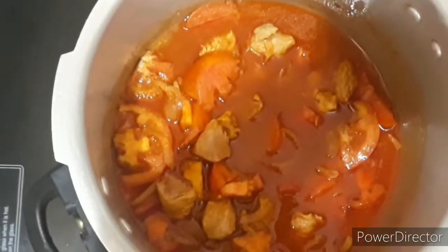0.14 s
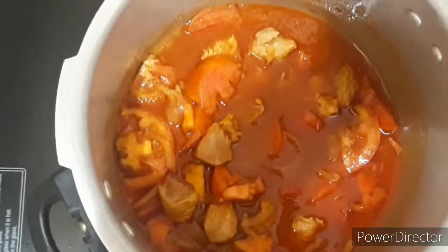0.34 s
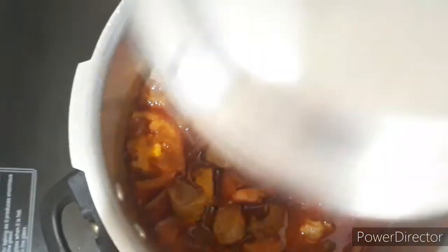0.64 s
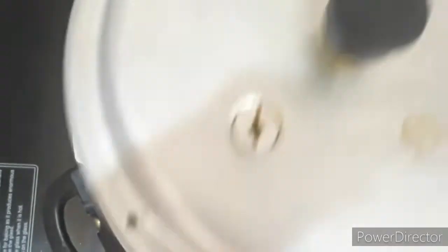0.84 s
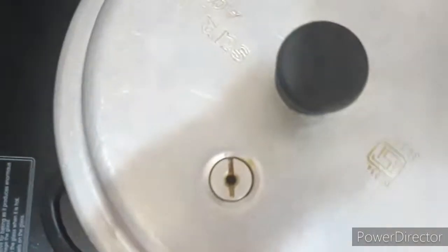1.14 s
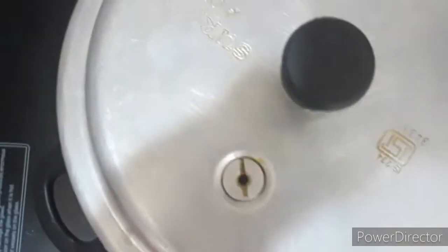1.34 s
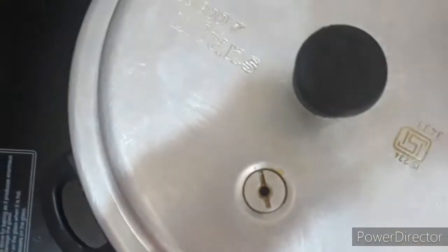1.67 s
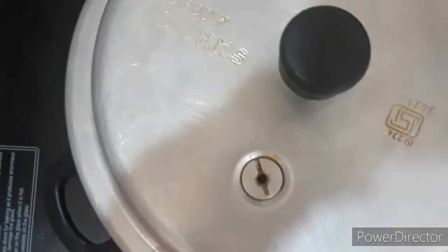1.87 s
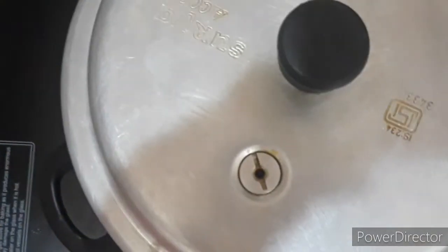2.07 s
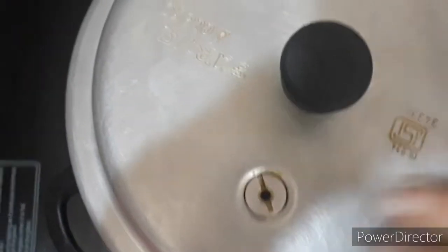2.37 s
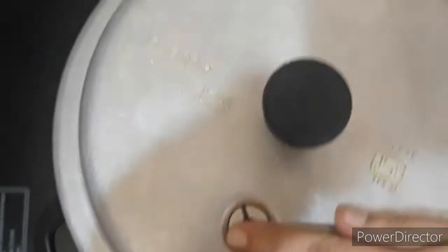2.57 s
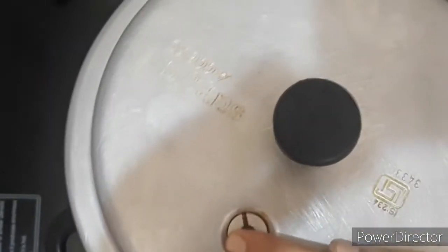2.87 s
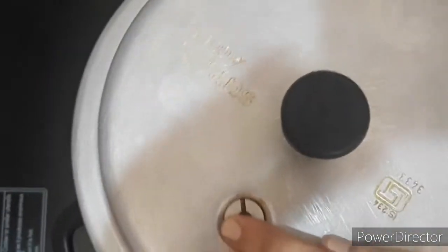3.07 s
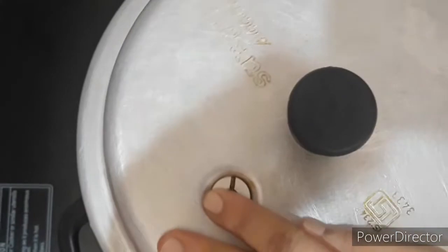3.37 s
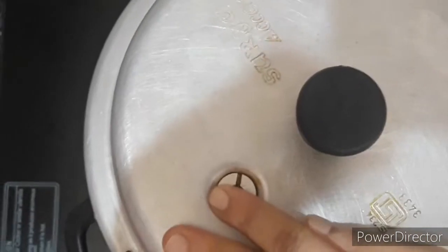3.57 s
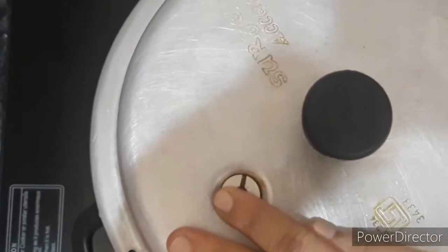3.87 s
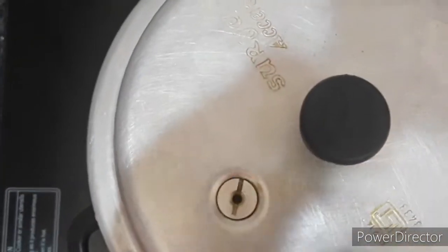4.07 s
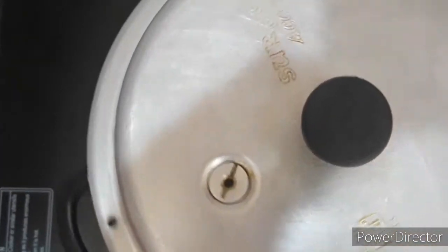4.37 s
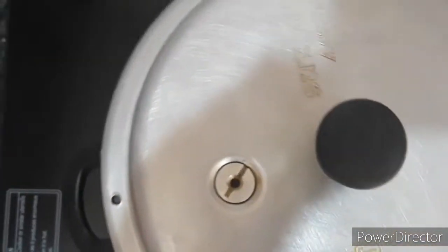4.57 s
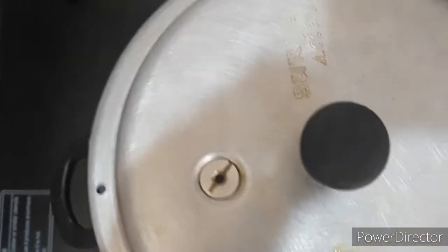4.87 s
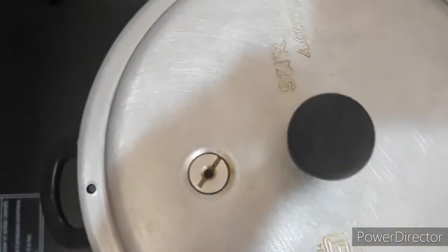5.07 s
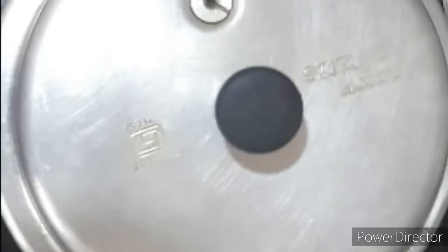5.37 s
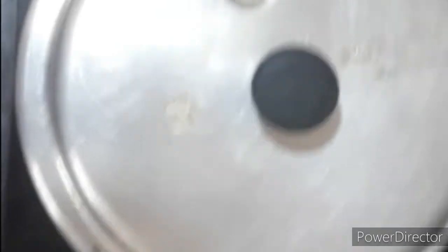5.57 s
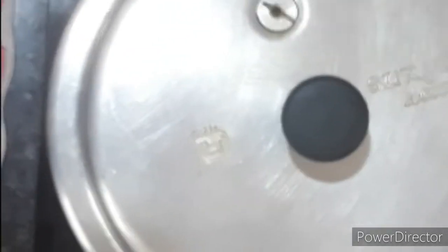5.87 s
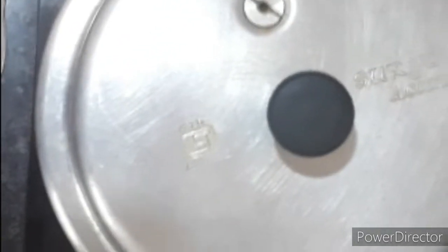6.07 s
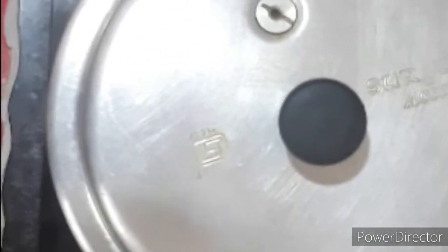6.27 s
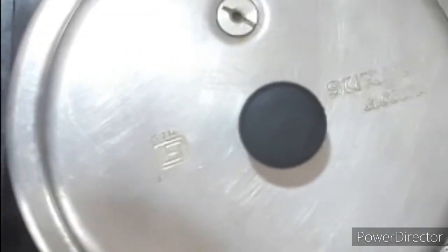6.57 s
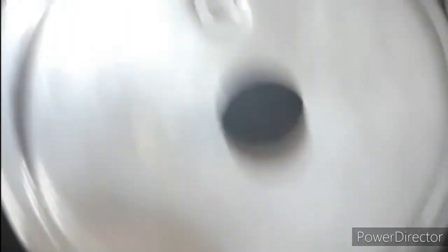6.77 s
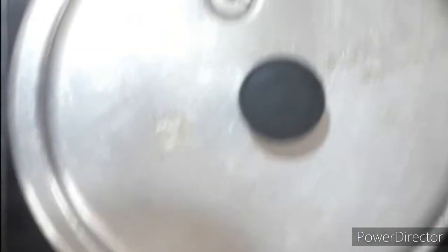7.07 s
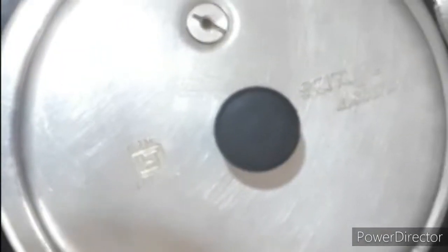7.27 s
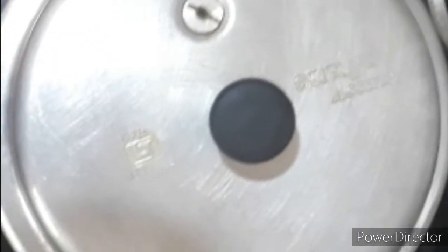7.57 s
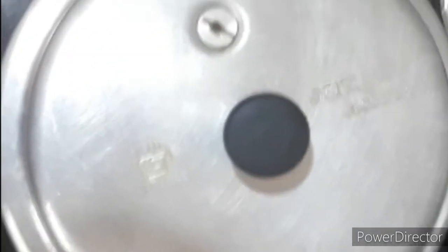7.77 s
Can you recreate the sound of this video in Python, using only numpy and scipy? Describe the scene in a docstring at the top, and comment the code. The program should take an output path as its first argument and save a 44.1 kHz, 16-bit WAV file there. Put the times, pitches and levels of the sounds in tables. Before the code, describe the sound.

A metal lid clanks onto a pressure cooker and grinds shut, then steam hisses and whistles, twice surging into a brighter jet.

```python
"""In a quiet kitchen a utensil clinks, then a metal lid is knocked onto a pressure cooker: each contact
cracks, rings the metal and thuds in the pot. A palm rubs the lid and twists it shut; the rubber seal
groans, rim grinds on rim and the hob booms. After a short silence steam hisses and whistles under the
weight, which twice lifts and lets a brighter jet blow at the microphone and buffet it."""
import sys
import numpy as np
from scipy import signal
from scipy.fft import rfft, irfft, next_fast_len
from scipy.io import wavfile
from scipy.ndimage import uniform_filter1d, map_coordinates

SR = 44100
rng = np.random.default_rng(int(sys.argv[2]) if len(sys.argv) > 2 else 0)


def to_wav(sig):
    """Store sig (one row per channel, or 1-D mono) as 16-bit WAV at the path in sys.argv[1].

    Samples outside -1..1 are clipped; the rate is SR.
    """
    pcm = np.clip(np.atleast_2d(sig), -1, 1) * 32767
    pcm = np.round(pcm).astype(np.int16)
    wavfile.write(sys.argv[1], SR, pcm.T)  # frames by channels


N = 349633
CLOCK = np.arange(N) / SR
PAUSE_FROM_S, PAUSE_TO_S = 5.375, 5.4385
RATTLE = .0022  # phase shake of loosely seated metal

# Modes of lid and pot: (pitch [Hz], level [dB], t60 [s])
METAL_MODES = [(222, 0, .1), (340, 0, .1), (455, -1, .1), (641, -3, .07), (880, -2, .06), (1100, 0, .09),
               (1416, -2, .07), (1800, -5, .09), (2455, -6, .16), (3520, -7, .08), (4480, -3, .08),
               (4720, 0, .09), (5500, -4, .07), (6700, -12, .07)]
# Tone of a contact's crack: (frequency [Hz], level [dB])
CRACK_EQ = [(240, -24), (400, -5.5), (850, -1), (2750, -6.5), (4700, -1), (7800, -11), (10000, -27),
            (15500, -37)]
# The ring is choked by a hand, then further by the lock: (from time [s], ring level [dB])
RING_DAMPING = [(0, -17), (2.5, -24.5), (4.3, -31)]
# Lid hits: (time [s], clink [dB], knock [dB], thud [dB], thud pitch [Hz])
LID_HITS = [(1.1055, -3.5, -1, 3.5, 351.5), (1.1815, -6, -0.5, -0.5, 328.5), (1.2536, 4.5, 5.5, -3.5, 334),
            (1.2808, 11, -22, -0.5, 198), (1.4194, -30, -24, -4, 276), (1.4636, -9, -4, -9, 249),
            (1.577, -25.5, -14.5, -23.5, 322), (1.6891, -25, -18.5, -11, 227), (1.85, -32, -24, -9, 196),
            (1.888, 4, -0.5, -8, 234), (2.589, -26, -31, -30, 151), (2.727, -48, -18.5, -35, 231),
            (2.7512, -9, 1, -21.5, 260), (2.913, -16.5, -9, -21, 238), (3.4304, -25, -16.5, -21, 263),
            (4.19, -54, -23, -36, 243), (4.369, -31, 2.5, -23, 333), (4.4229, -4, 13.5, -1.5, 424),
            (5.0446, -24.5, -25, -26, 369), (5.2058, -41, -12.5, -21.5, 403),
            (5.3423, -34, -27.5, -22.5, 96)]


def lid_hits():
    """Every contact cracks, rings the metal in a new balance and thuds in the hollow under the lid."""
    out, t = np.zeros(N + SR), np.arange(SR // 4) / SR
    mode_hz = np.transpose(METAL_MODES)[0]
    for s, clink_db, knock_db, thud_db, thud_hz in LID_HITS:
        softness_db = -min(max(clink_db, knock_db), 0)
        attack = 1 - np.exp(-t / (0.0024 * amp(0.24 * softness_db)))  # softer hits speak more slowly
        ring_db = [db for since, db in RING_DAMPING if s >= since][-1]
        balance = amp(ring_db + rng.normal(0, 4.85, len(mode_hz)))
        mode_gains = balance * drive(mode_hz, clink_db, knock_db)
        burst = amp(-60 * t / 0.058) * attack * rng.standard_normal(len(t))
        pot_body = lambda f: amp(thud_db + 11.5 - 14.7 * np.log2(f / 250 + 1e-9) ** 2)
        crack = filtered(burst, lambda f: eq(CRACK_EQ)(f) * drive(f, clink_db, knock_db) + pot_body(f))
        ring = attack * (mode_gains @ ringing(METAL_MODES, t, RATTLE, swell_cycles=0.6))
        thud = ringing([(thud_hz, thud_db, .075)], t, shake=0.0014, swell_cycles=2.6)[0]
        place(out, s, crack + ring)
        place(out, s - .006, thud)  # the push leads the crack
    return out[:N]


# The weight's lift, as a fader ride on the jet: (time [s], level [dB])
JET_RIDE = [(5.44, -26), (6.0, -28), (6.3, -42), (6.41, -12.5), (6.44, -7.5), (6.72, -11.5), (6.77, -23.5),
            (7.1, -21.5), (7.17, -17), (7.25, -12), (7.29, -8.5), (7.93, -9)]


def steam():
    """Leak and jet flutter together; as the weight lifts, the jet swings onto the microphone."""
    jet_db = np.interp(CLOCK, *np.transpose(JET_RIDE))
    swing_db, swing_width_db = -10.5, 0.6
    on_mic = 1 / (1 + np.exp((swing_db - jet_db) / swing_width_db))
    flutter = amp(0.66 * wobble(14) + 0.2 * wobble(300))
    return flutter * (leak(on_mic) + jet(jet_db)) + buffeting(on_mic) + puffs()


# Tone of the open jet: (frequency [Hz], level [dB])
JET_EQ = [(900, -31.5), (2200, -21), (3450, -4.5), (6000, -11.5), (7950, -0.5), (8600, -2), (9300, -10),
          (10800, -8), (13500, -1), (15500, -3.5)]


def jet(jet_db):
    """Turbulence past the lifted weight hisses brightly; half open, it sings lower."""
    hiss = amp(jet_db) * noise(eq(JET_EQ), patchy_db=.6)
    half_open = np.exp(-((jet_db + 16) / 6.5) ** 2)
    return hiss + amp(-24.5) * half_open * vent_whistle([(5800, 1300, 0)])


# Tone of the leak: (frequency [Hz], level [dB])
LEAK_EQ = [(300, -47), (700, -33), (1700, -19.5), (2500, -5.5), (3700, -5.5), (6800, -14), (8400, -13),
           (9500, -12), (15500, -6.5)]
# Vent pipe resonances: (pitch [Hz], width [Hz], level [dB])
VENT_MODES = [(2970, 170, -5), (3480, 280, 0), (4250, 170, 0), (5130, 340, -7)]


def leak(on_mic):
    """Steam squeezes under the weight and whistles in the vent, ducking while the jet is on the mic."""
    loosened = CLOCK > 6.43  # after its first lift the weight never seats as tightly
    low_whistle = amp(-6 - 1.9 * loosened) * vent_whistle(VENT_MODES[:2])
    high_whistle = amp(-7 - 8 * loosened) * vent_whistle(VENT_MODES[2:])
    hiss = noise(eq(LEAK_EQ), patchy_db=1.84)
    surge_db = 3.7 * np.exp(-((CLOCK - 6.4) / 0.055) ** 2)  # pressure peaks before that lift
    return amp(-14 + surge_db - 2.5 * on_mic) * (hiss + low_whistle + high_whistle)


def vent_whistle(modes):
    """Turbulence through the vent's resonances makes a breathy whistle, at rms 1."""
    return noise(lambda f: sum(amp(db) * resonance(f, hz, width) for hz, width, db in modes), 0.5)


# Tone of steam blowing on the microphone: (frequency [Hz], level [dB])
BUFFET_EQ = [(15, -58), (60, -17), (283, -11.5), (515, -9), (2500, -11), (3250, -22), (5500, -120)]


def buffeting(on_mic):
    """The jet hits the microphone as a broad roar with lumps of bass."""
    roar = noise(eq(BUFFET_EQ), patchy_db=1.2)
    lumps = amp(7 * wobble(28))
    bass = noise(lambda f: f ** 2 / (1 + (f / 170) ** 4), patchy_db=2.0)
    return amp(-56.5 + 28 * on_mic) * (roar + 0.35 * unit(lumps * bass))


# Steam puffs: (time [s], level [dB], rough pitch [Hz])
STEAM_PUFFS = [(5.609, -28.5, 207), (6.28, -27.5, 200), (6.836, -16, 212), (7.152, -19, 342),
               (7.39, -10.5, 141), (7.457, -3.5, 162), (7.648, -1, 128), (7.81, -3, 162), (7.843, -9, 111)]


def puffs():
    """Each puff thumps the microphone with one push and its rebound."""
    out, t = np.zeros(N), np.arange(2048) / SR
    for s, db, hz in STEAM_PUFFS:
        age = 8 * hz * t
        place(out, s, amp(db) * age * (2 - age) * np.exp(-age))
    return out


# Rim scrapes: (time [s], attack [s], hold [s], groan [dB], rasp [dB])
RIM_DRAGS = [(1.277, .01, 0.014, -25.5, -18), (4.435, 0.13, 0.092, -16, -18.5),
             (4.793, 0.23, 0.19, -49, -59), (5.048, 0.0094, 0.01, -36, -51), (5.224, 0.052, 0.02, -40, -43)]


def rim_drags():
    """Rim drags on rim: dense, uneven slips scrape and ring the metal in three bands."""
    mode_hz = np.transpose(METAL_MODES)[0]
    rings = ringing(METAL_MODES, np.arange(SR // 4) / SR, RATTLE, swell_cycles=0.42)
    groan = [(s, attack, hold, db) for s, attack, hold, db, _ in RIM_DRAGS]
    grind = [(s, attack * 1.27, hold, db + 5) for s, attack, hold, _, db in RIM_DRAGS]
    rasp = [(s, attack, hold, db) for s, attack, hold, _, db in RIM_DRAGS]
    bands = [(groan, 150, 600, 0.86), (grind, 600, 2500, 0.26), (rasp, 2500, 16000, 0.05)]
    out = np.zeros(N)
    for strokes, low_hz, high_hz, ring_mix in bands:
        level = envelope(strokes, release_s=0.17)
        slips = unit(rng.standard_normal(N) * amp(3.5 * wobble(180) + 1.2 * wobble(35)))
        body = rings[(mode_hz > low_hz) & (mode_hz < high_hz)].sum(axis=0)
        ring = signal.fftconvolve(level * slips, body / np.linalg.norm(body))[:N]
        band_cut = lambda f: np.sqrt((1 + (low_hz / (f + 1)) ** 4) * (1 + (f / high_hz) ** 4))
        scrape = unit(filtered(slips, lambda f: eq(CRACK_EQ)(f) / band_cut(f)))
        out += level * scrape + ring_mix * ring
    return out


# Seal groans: (time [s], attack [s], hold [s], level [dB])
SEAL_GROANS = [(4.265, 0.034, 0.024, -34), (4.355, 0.17, 0.068, -17)]


def rubber_seal():
    """Rubber sticks and slips: an unsteady, sagging tone with a scratch on each slip."""
    hz = 315 + 58 * np.exp(-np.maximum(CLOCK - 4.24, 0) / 0.1214)
    phase = 2 * np.pi * np.cumsum(hz * (1 + 0.033 * wobble(70))) / SR
    scratch = (1 + np.cos(phase)) * noise(lambda f: f / (1 + (f / 800) ** 2), patchy_db=4.5)
    level = envelope(SEAL_GROANS, release_s=0.12) * amp(2.4 * wobble(40))
    return level * (np.sin(phase) + 0.12 * scratch)


# Heavy pushes on the hob: (time [s], level [dB])
HOB_BOOMS = [(1.899, -37), (2.589, -42), (4.451, -26)]


def hob():
    """The steel top booms in one low, long mode."""
    out, t = np.zeros(N + SR), np.arange(SR) / SR
    for s, db in HOB_BOOMS:
        place(out, s, ringing([(82, db, 1.28)], t, shake=.0002, swell_cycles=1.2)[0])
    return out[:N]


# Modes of the utensil: (pitch [Hz], level [dB], t60 [s])
UTENSIL_MODES = [(1000, -7, .09), (1600, 0, .1), (1820, -2, .25), (2455, -4, .25), (4850, -3, .16),
                 (6600, -8, .11), (7510, -14, .15)]
# It is set down, later shaken: (time [s], level [dB], brightness [dB/octave])
UTENSIL_CLINKS = [(0.0, -37, -1), (0.0813, -16.5, -0.5), (1.606, -35, -2.5), (2.368, -51, 8),
                  (2.45, -53.5, 4)]


def utensil():
    """A light utensil clinks: a tick and a bright ring with no body."""
    out, t = np.zeros(N), np.arange(SR // 3) / SR
    thin_crack = lambda f: eq(CRACK_EQ)(f) * drive(f, 0, -11) / (1 + (900 / (f + 1)) ** 6)
    for s, db, tilt_db in UTENSIL_CLINKS:
        tick = filtered(amp(0.5 - 60 * t / 0.11) * rng.standard_normal(len(t)), thin_crack)
        ring = ringing(UTENSIL_MODES, t, RATTLE / 3, swell_cycles=0.84).sum(axis=0)
        tilt = lambda f: amp(db + tilt_db * np.log2(f / 2000 + 1e-9))
        place(out, s, filtered(tick + 0.55 * ring, tilt))
    return out


# Tone of skin on metal: (frequency [Hz], level [dB])
SKIN_EQ = [(300, -13), (1100, -0.5), (2500, -5), (5000, -0.5), (9000, -12), (14000, -16.5)]
# Strokes over the lid: (time [s], attack [s], hold [s], level [dB])
PALM_STROKES = [(2.72, 0.24, 0.32, -53.5), (3.2, 0.32, 0.23, -45.5), (3.72, 0.4, 0.19, -51.5),
                (4.08, 0.36, .03, -56)]


def palm():
    """Skin slides on metal: a soft, patchy hiss that faintly rings the lid."""
    hiss = amp(0.93 * wobble(29)) * noise(eq(SKIN_EQ), patchy_db=3.5)
    body = ringing(METAL_MODES, np.arange(SR // 4) / SR, shake=0, swell_cycles=0.98).sum(axis=0)
    ring = unit(signal.fftconvolve(hiss, body)[:N])
    return envelope(PALM_STROKES, release_s=0.33) * (hiss + 0.12 * ring)


# Faint handling ticks: (time [s], level [dB])
HANDLE_TICKS = [(0.739, -34), (0.821, -31.5), (3.984, -32)]


def handle_ticks(pitch_hz=980):
    """A fingertip or nail touches the handle: a cycle or two, no ring."""
    out, cycles = np.zeros(N), np.arange(SR // 50) / SR * pitch_hz
    for s, db in HANDLE_TICKS:
        place(out, s, amp(db - 20 * cycles / 0.98) * np.sin(2 * np.pi * cycles))
    return out


# Decay of the kitchen: (frequency [Hz], t60 [s])
ROOM_DECAY = [(300, 0.43), (3000, 0.45), (15000, 0.37)]


def kitchen_reverb(x):
    """Each frequency dies away at its own speed; the tail is new every third of a second."""
    out, step, predelay = np.zeros(N + SR), SR // 3, 200
    for start in range(0, int(PAUSE_FROM_S * SR), step):
        hz, t, spectra = signal.stft(rng.standard_normal(SR // 2), SR, nperseg=256)
        decay = amp(-60 * t / curve(ROOM_DECAY, hz)[:, None])
        tail = signal.istft(spectra * decay, SR, nperseg=256)[1]
        wet = signal.fftconvolve(x[start:start + step], tail / np.linalg.norm(tail))
        out[start + predelay:][:len(wet)] += wet
    return out[:N]


# Appliance hums: (pitch [Hz], width [Hz], level [dB])
APPLIANCE_HUMS = [(98, 20, -57), (454.6, 51, -61.5)]
# Tone of the kitchen air: (frequency [Hz], level [dB])
AIR_EQ = [(25, -7.5), (90, -3), (250, -7), (550, -16), (900, -18), (3200, -20.5), (5000, -15.5),
          (15500, -28)]


def room_tone():
    """A bed of air and two wavering appliance hums swells up at the start."""
    hums = sum(amp(db) * unit(filtered(rng.standard_normal(N), lambda f: resonance(f, hz, width)))
               for hz, width, db in APPLIANCE_HUMS)
    air = amp(-57 + 0.57 * wobble(1.9)) * noise(eq(AIR_EQ), patchy_db=1.5)
    swell = amp(-5 * np.maximum(1 - CLOCK / 0.63, 0))
    return swell * (hums + air)


def drive(hz, clink_db, knock_db):
    """How hard a contact drives each frequency: knock in the mids, clink in the highs."""
    low_cut = 1 / (1 + (520 / (hz + 1)) ** 6)
    highs = 1 / (1 + (2000 / (hz + 1)) ** 4)
    return low_cut * (amp(knock_db) * (1 - highs) + amp(clink_db) * highs)


def ringing(modes, t, shake, swell_cycles):
    """One swelling, dying sine per mode; loose contact shakes its phase."""
    hz, db, t60 = np.transpose(modes)[:, :, None]
    drift = np.cumsum(rng.standard_normal((len(hz), len(t))), axis=1) * shake * np.sqrt(hz)
    attack = 1 - np.exp(-(t * hz / swell_cycles) ** 2)
    return attack * amp(db - 60 * t / t60) * np.sin(2 * np.pi * hz * t + drift)


def envelope(strokes, release_s):
    """Summed gain of strokes, each full at its time; attack and release span 40 dB."""
    return sum(amp(db - 40 * np.maximum((s - CLOCK) / attack, (CLOCK - s - hold) / release_s).clip(0))
               for s, attack, hold, db in strokes)


def noise(response, patchy_db):
    """Shaped noise at rms 1, with random patches of gain across time and frequency."""
    spectra = signal.stft(rng.standard_normal(N), nperseg=512)[2]
    patches = uniform_filter1d(rng.standard_normal(spectra.shape), 6, axis=0)
    patches = unit(uniform_filter1d(patches, 12, axis=1))
    patchy = signal.istft(spectra * amp(patchy_db * patches), nperseg=512)[1][:N]
    return unit(filtered(patchy, response))


def wobble(rate):
    """A smooth random curve, rate knots a second."""
    knots = rng.standard_normal(int(N * rate / SR) + 4)
    return map_coordinates(knots, [CLOCK * rate])


def filtered(x, response):
    """x through a frequency response."""
    n = x.shape[-1]
    padded = next_fast_len(n + 8192)
    return irfft(rfft(x, padded) * response(np.fft.rfftfreq(padded, 1 / SR)), padded)[..., :n]


def resonance(f, hz, width):
    """Gain of one resonant peak."""
    return 1 / (1 + (2 * (f - hz) / width) ** 2)


def curve(points, hz):
    """Read (frequency, value) points on a log axis."""
    f, values = np.transpose(points)
    return np.interp(np.log(hz + 1), np.log(f + 1), values)


def eq(points):
    """The response of an EQ table."""
    return lambda hz: amp(curve(points, hz))


def amp(db):
    """dB to gain."""
    return 10 ** (np.asarray(db) / 20)


def unit(x):
    """x at rms 1."""
    return x / np.sqrt(np.mean(x ** 2) + 1e-20)


def place(track, s, sound):
    """Mix a sound in at s seconds."""
    track[round(s * SR):][:len(sound)] += sound


def scene():
    """Lid work in the room, then dry steam; one microphone feeds both channels almost alike."""
    lid = lid_hits() + utensil() + rim_drags() + rubber_seal() + palm()
    closing = amp(-3.5) * lid + amp(-5) * kitchen_reverb(lid) + handle_ticks() + hob() + room_tone()
    mid = np.where(CLOCK < PAUSE_TO_S, closing, steam())
    side = amp(-95.5) * signal.fftconvolve(mid, rng.standard_normal(256))[:N]
    return np.array([mid + side, mid - side])


# A notch above the microphone's port resonance: (frequency [Hz], level [dB])
MIC_EQ = [(8000, 0.5), (9500, -8), (12000, -1.5), (14000, 0)]


def record(dry):
    """The microphone thins the bass and notches the treble; peaks clip softly, the pause is muted."""
    low_cut_hz, top_hz, ceiling = 65, 15600, .88
    coloured = filtered(dry, lambda hz: (1j * hz / (low_cut_hz + 1j * hz)) ** 2 * eq(MIC_EQ)(hz))
    clipped = coloured / (1 + np.abs(coloured / ceiling) ** 6) ** (1 / 6)
    gate = (CLOCK < PAUSE_FROM_S) | (CLOCK > PAUSE_TO_S)
    return filtered(clipped * gate, lambda hz: np.clip((top_hz - hz) / 120, 0, 1) ** 2)


dry = scene()
out = record(dry)
to_wav(out)
```